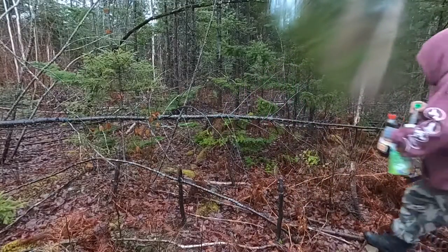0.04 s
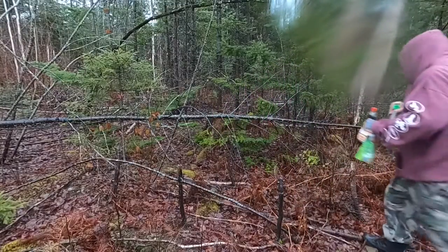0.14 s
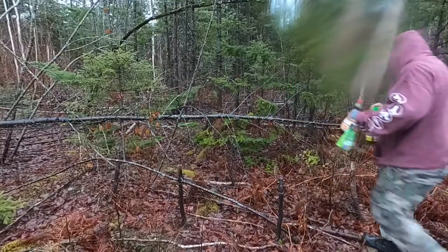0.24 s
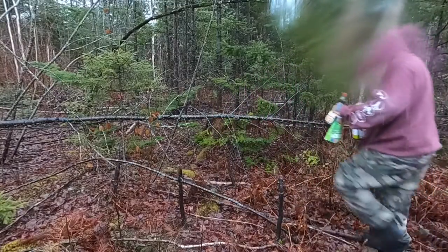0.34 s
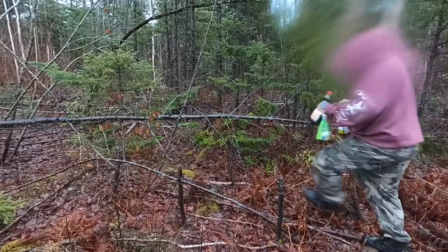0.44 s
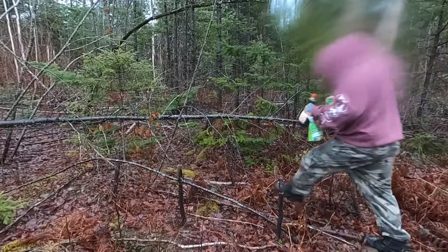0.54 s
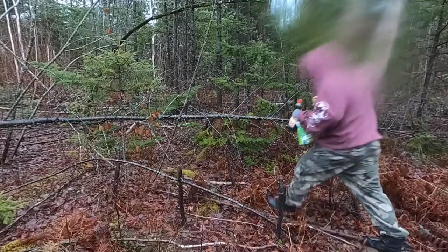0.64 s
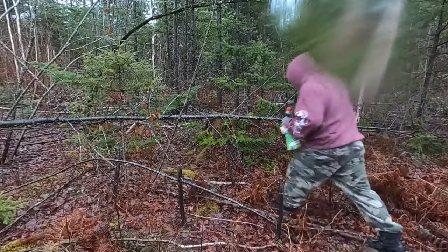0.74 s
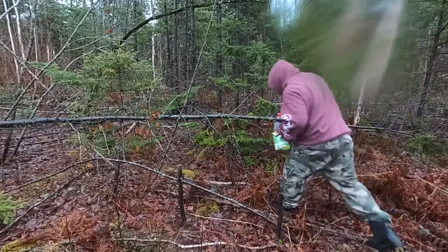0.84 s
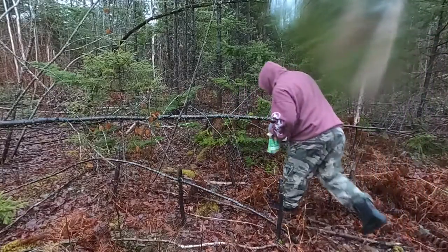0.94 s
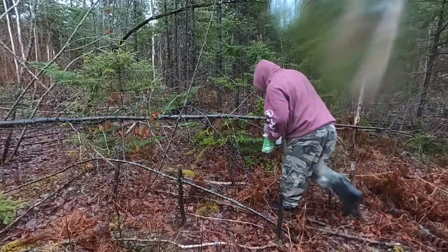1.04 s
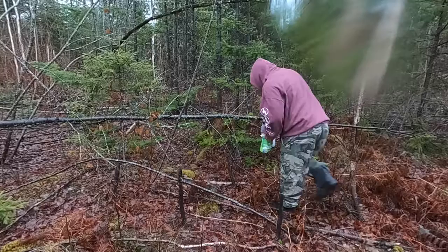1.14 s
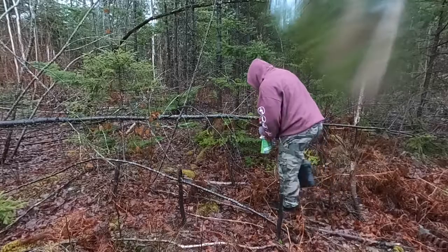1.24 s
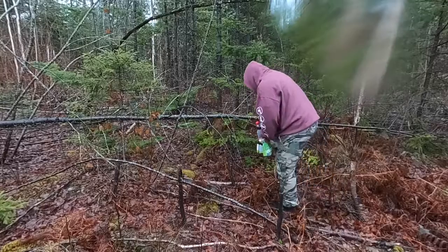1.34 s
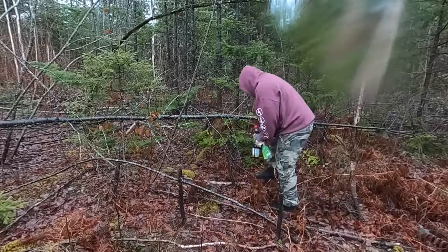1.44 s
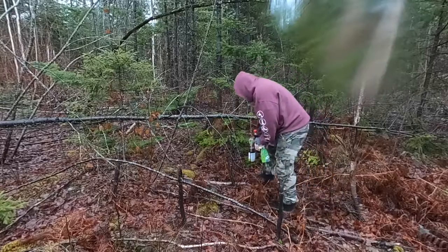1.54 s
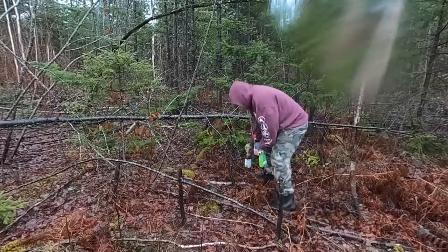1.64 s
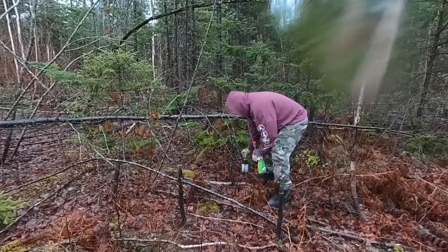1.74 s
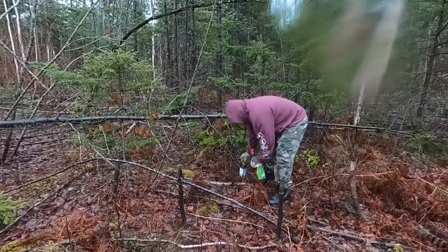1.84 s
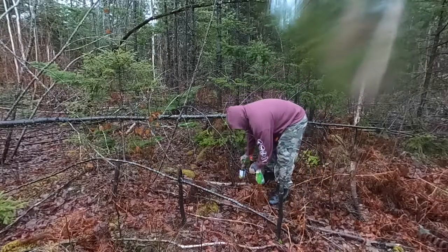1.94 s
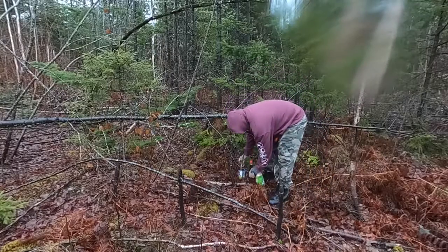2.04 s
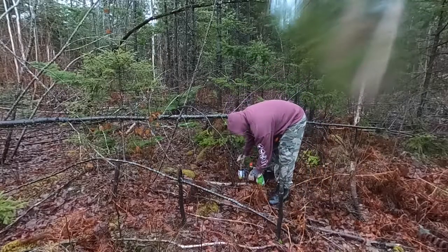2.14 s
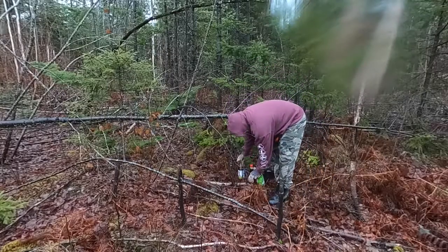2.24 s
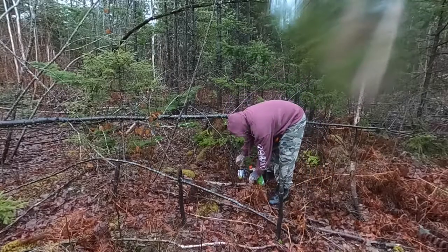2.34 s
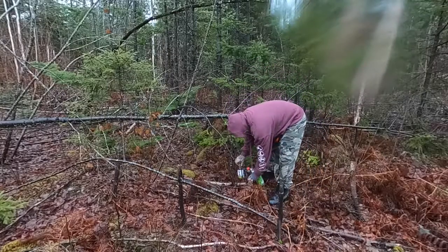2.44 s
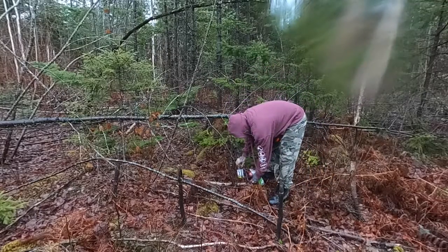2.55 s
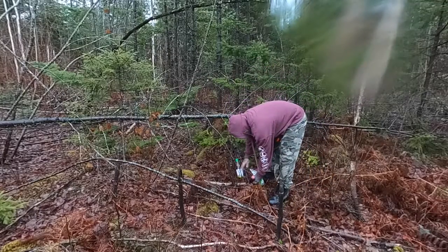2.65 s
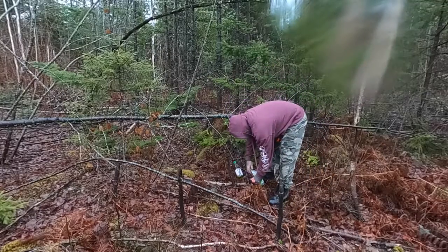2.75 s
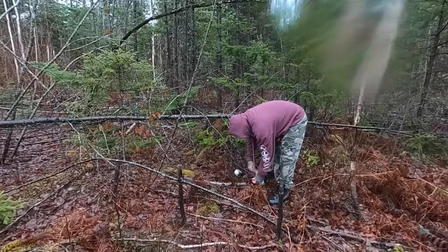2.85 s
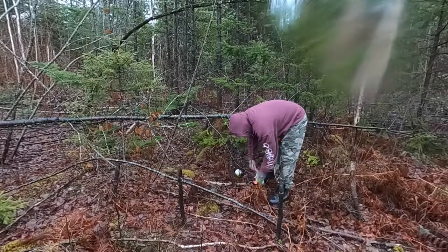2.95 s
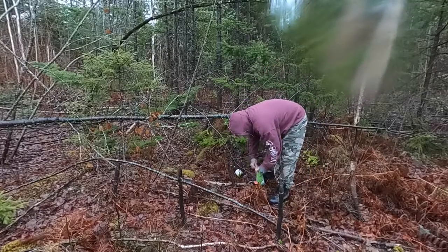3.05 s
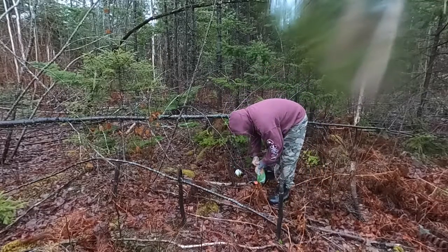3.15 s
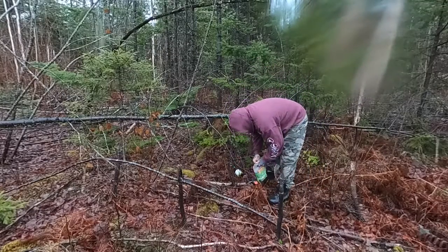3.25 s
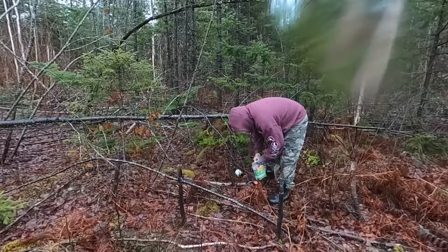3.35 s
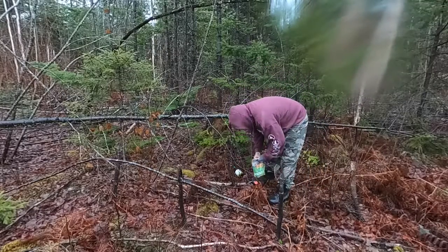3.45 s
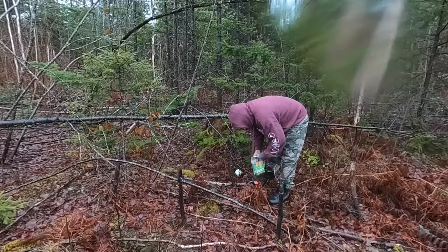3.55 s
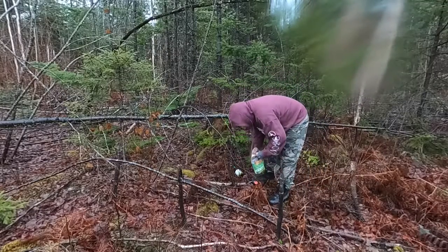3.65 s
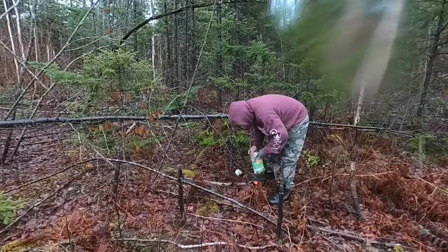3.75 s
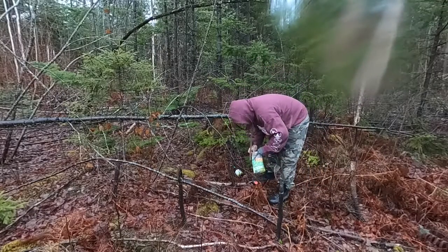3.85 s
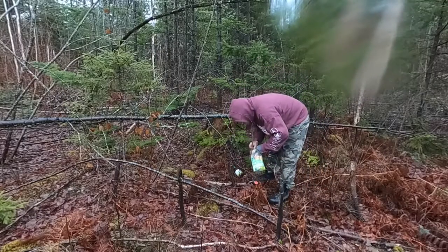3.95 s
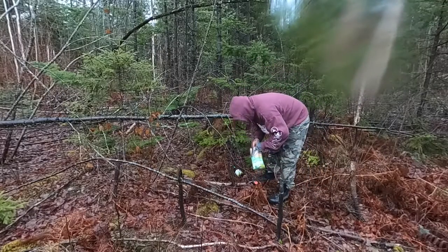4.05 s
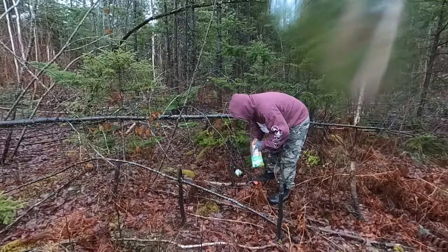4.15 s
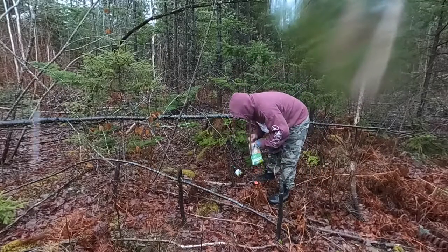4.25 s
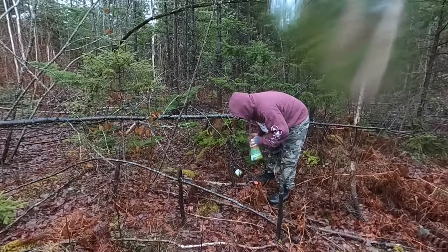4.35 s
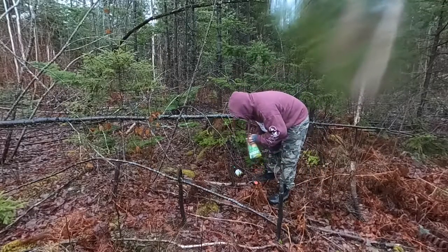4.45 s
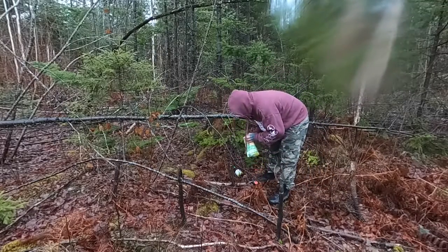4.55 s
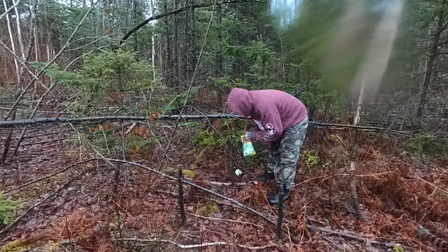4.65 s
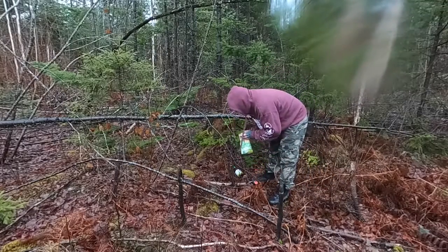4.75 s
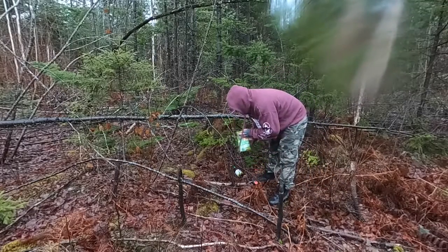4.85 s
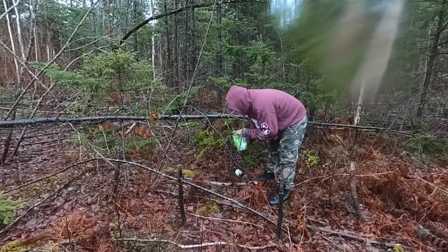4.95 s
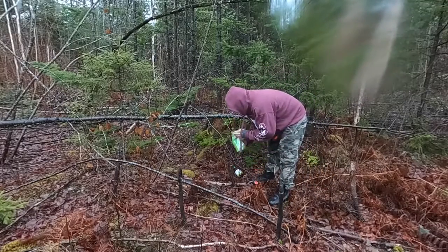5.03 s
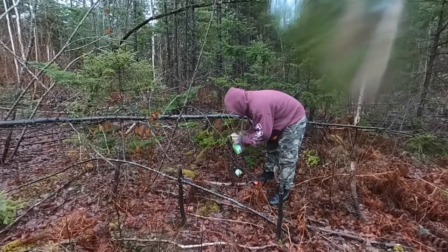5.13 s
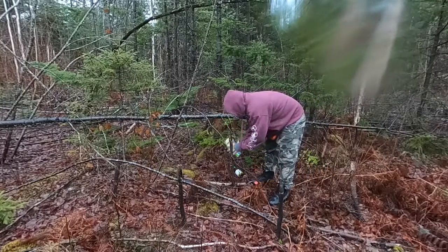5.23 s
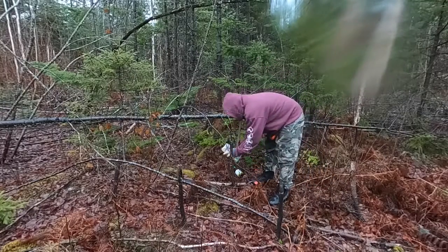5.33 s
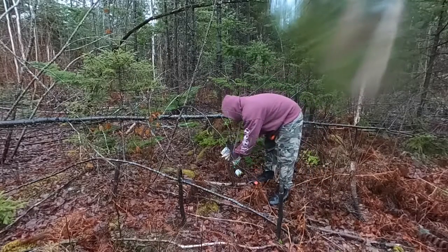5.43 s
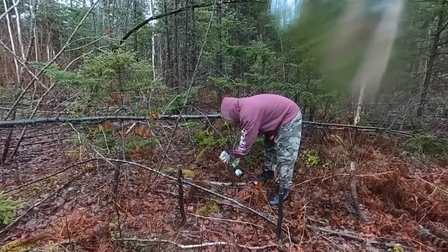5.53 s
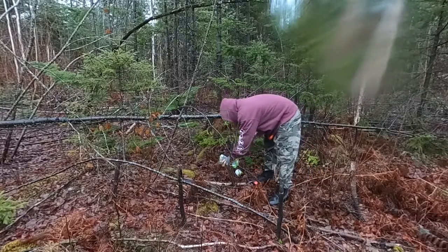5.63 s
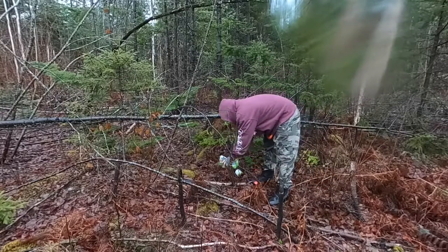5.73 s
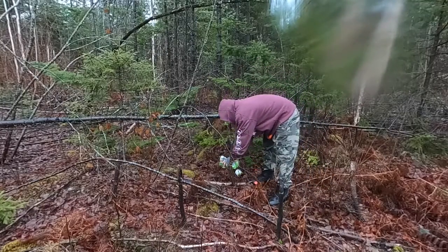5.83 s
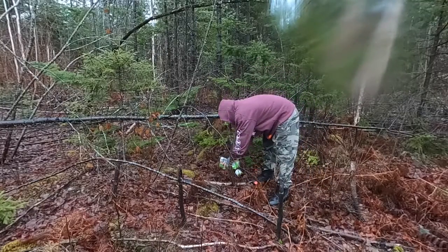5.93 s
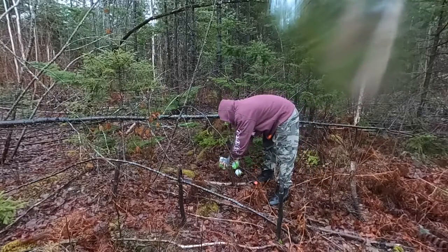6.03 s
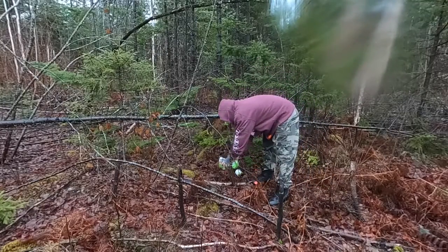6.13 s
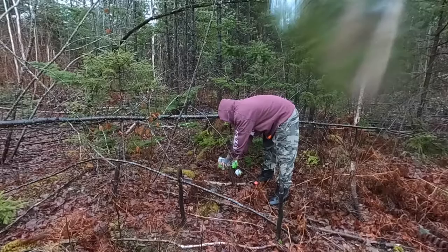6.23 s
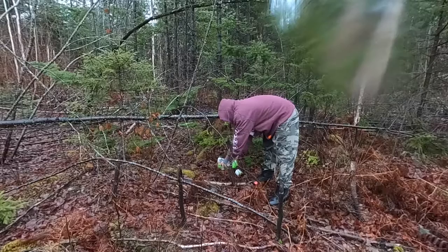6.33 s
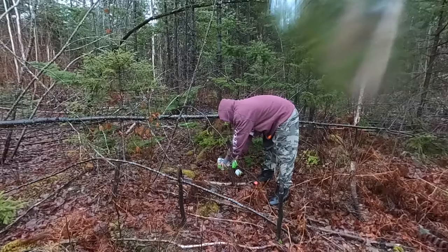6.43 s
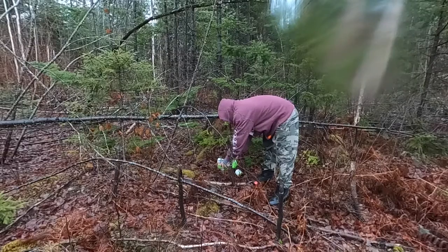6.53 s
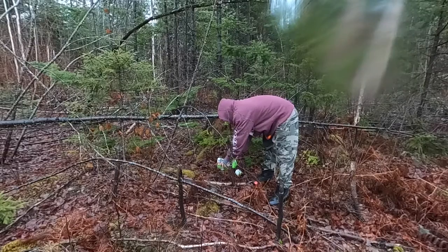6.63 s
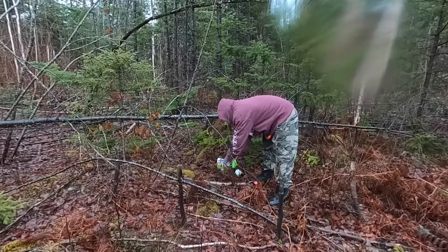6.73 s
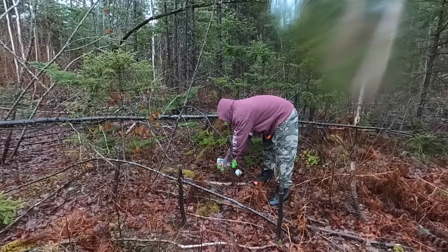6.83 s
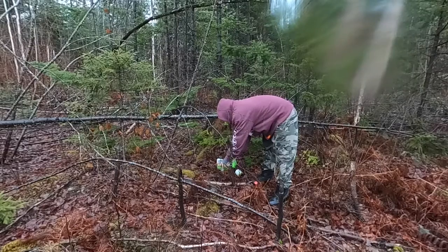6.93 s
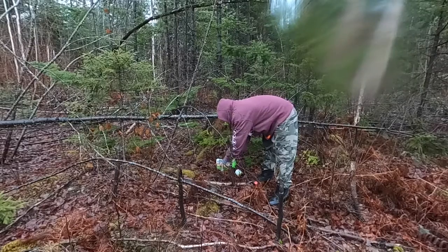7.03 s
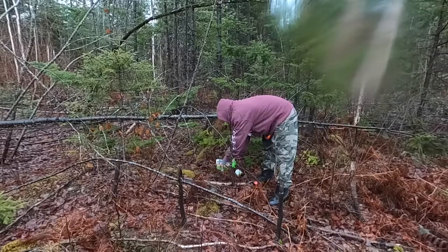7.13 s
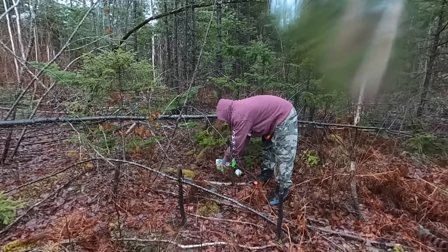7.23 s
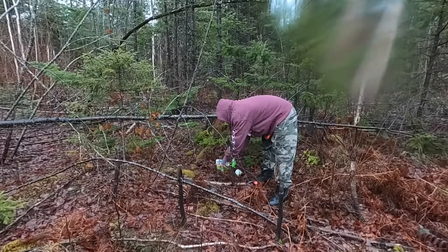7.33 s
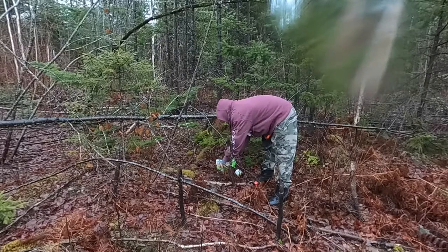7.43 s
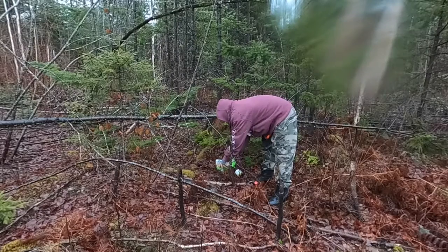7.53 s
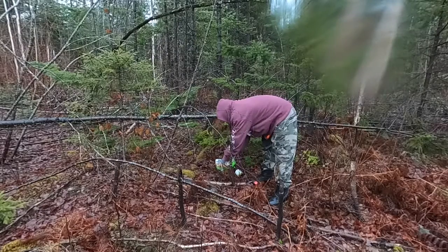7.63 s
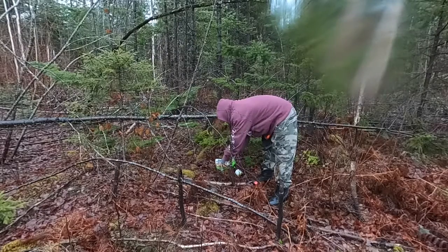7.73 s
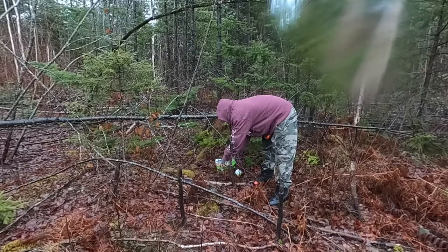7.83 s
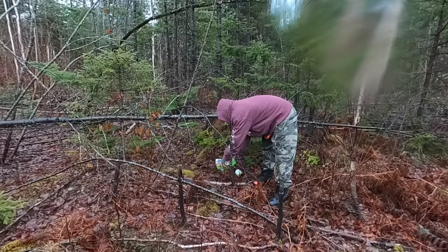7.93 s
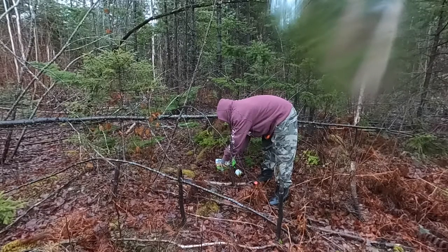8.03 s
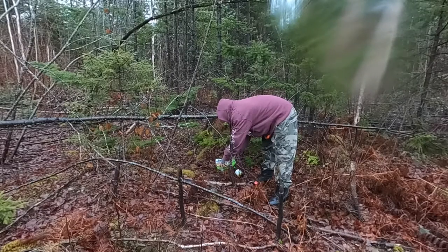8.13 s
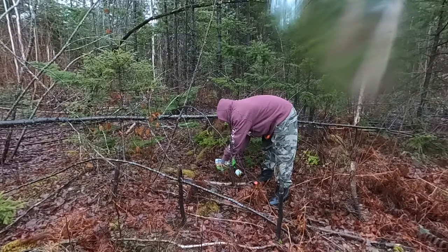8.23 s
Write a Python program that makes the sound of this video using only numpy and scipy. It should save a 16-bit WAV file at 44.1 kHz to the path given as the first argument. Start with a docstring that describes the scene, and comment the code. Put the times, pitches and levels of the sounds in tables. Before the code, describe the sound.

Brittle stems snap and fronds rustle under a walker's steps, then scattered picking and twig cracks thin out to a faint forest hush.

```python
"""Dry stems snap and crushed fronds crackle as boots stride into dead bracken in a quiet wood, some metres away.
The walker then stoops, shifts about and picks at the litter. Each stem is a noise volley with a ring of its own;
crackle is clumped random fractures, swishes are swelling noise, heels thud as sinking, fast-dying tones.
Sparse reflections from the trunks give a short tail. Below lie a far, dull rush of air (filtered noise),
one draught (low rumble) and one faint bird note (a sliding sine)."""
import sys
import numpy as np
from scipy import signal
from scipy.fft import rfft, irfft
from scipy.io import wavfile
from scipy.ndimage import uniform_filter1d

SR = 44100
rng = np.random.default_rng(int(sys.argv[2]) if len(sys.argv) > 2 else 0)


def persist_wave(psi):
    """Save psi, clipped to +-1, as 16-bit WAV."""
    counts = np.round(np.clip(psi, -1, 1) * 32767).astype(np.int16)
    wavfile.write(sys.argv[1], SR, np.atleast_2d(counts).T)


N = 365244
TIME_S = np.arange(N) / SR

# spectrum of the far air: f/Hz, level/dB
AIR_SPECTRUM = [(25, -4.5), (100, -8.5), (170, -3.5), (400, -0.2), (650, -6), (950, -11.5), (1600, -12.5),
                (2800, -26), (5600, -20.5), (7000, -25.5), (10000, -10.5), (14000, -19)]
# stir of air at the microphone: t/s, width/s, level/dB
DRAUGHT_SWELL = (6.97, .12, -54.5)
# far bird, points along one note: t/s, f/Hz, level/dB
BIRD_NOTE = [(2.326, 4670, -57), (2.339, 5620, -61), (2.351, 5440, -38)]
# fronds sweeping along legs and sleeves: t/s at the fastest, half width/s, level/dB
SWISH_EVENTS = [(0.3, 0.069, -50), (0.7, 0.025, -50), (1.13, 0.03, -49.5), (1.32, 0.14, -53.5),
                (1.61, 0.05, -52), (1.79, 0.059, -49), (1.889, 0.039, -44), (2.11, 0.17, -54.5),
                (2.92, 0.047, -52.5), (8.029, 0.084, -62.5)]
# spectrum of that brushing: f/Hz, level/dB
BRUSH_SPECTRUM = [(100, -24), (400, 5), (900, -9), (1600, 1.5), (2800, -5.5), (4000, -3), (5600, 0),
                  (7000, -3), (15000, -8)]
# spectrum of yielding ground: f/Hz, level/dB
SOIL_SPECTRUM = [(25, -32), (70, 1), (115, -14), (160, 7), (260, -11), (500, -11), (1200, -39)]
# weight landing on the soil: t/s, level/dB, initial f/Hz, decay/ms
HEEL_THUDS = [(0.065, -39.5, 256, 15), (0.147, -34.5, 309, 16), (0.227, -39, 334, 35),
              (0.308, -48, 142, 37), (0.7438, -17.5, 374, 2), (0.7547, -28.5, 181, 16),
              (0.769, -35, 96, 19), (0.817, -12.5, 290, 1.5), (1.035, -31, 384, 29),
              (1.286, -48.5, 154, 36), (1.616, -41, 214, 15), (3.715, -39.5, 176, 29)]
# boot or hand bearing down on the litter: start t/s, length/s, crackle level/dB, fizz over crackle/dB
LITTER_PRESSES = [ (0.03, 0.052, -44, -1.5), (0.103, 0.19, -49, -1.5), (0.208, 0.04, -43, -6),
                  (0.416, 0.1, -60.5, -11), (0.556, 0.024, -54, 8), (0.725, 0.044, -45, 8),
                  (0.782, 0.045, -50.5, 6), (0.845, 0.037, -38, -9), (0.894, 0.13, -41, -1),
                  (1.025, 0.045, -41, 0.5), (2.112, 0.049, -44.5, -1), (3.038, 0.051, -47, -5),
                  (3.103, 0.098, -58, -0.5), (3.222, 0.11, -51, 3), (3.364, 0.17, -57.5, 5),
                  (3.682, 0.034, -44.5, 1), (3.719, 0.032, -43, 5.5), (3.792, 0.054, -39.5, 3.5),
                  (3.869, 0.11, -53.5, -11), (4.117, 0.023, -48, 4), (4.195, 0.021, -52.5, 4.5),
                  (4.371, 0.079, -43.5, 1.5), (4.427, 0.047, -40.5, 2), (4.518, 0.025, -40.5, -3.5),
                  (4.564, 0.02, -38.5, -1), (4.907, 0.098, -48, 3), (5.017, 0.054, -43, 4.5),
                  (5.074, 0.17, -56.5, 2.5), (5.338, 0.042, -48, -2), (5.406, 0.087, -49, -6.5),
                  (5.499, 0.048, -47, 1), (5.586, 0.16, -56, 0.5), (5.771, 0.023, -55.5, 0.5),
                  (6.413, 0.042, -63.5, 6), (7.831, 0.062, -58.5, -13)]
# spectrum of the crackle's body: f/Hz, level/dB
LITTER_SPECTRUM = [(50, -18), (170, -4.5), (400, 4), (800, -2.5), (1450, 4.5), (2000, -5), (2700, -10),
                   (4500, -17)]
# spectrum of the fronds' fizz: f/Hz, level/dB
FROND_SPECTRUM = [(900, -14.5), (2000, -3), (2800, -5), (3900, -2), (5600, -10), (7000, -9)]
# stems snapping at listed moments, from loud cracks to faint ticks:
# t/s, woody body level/dB, splintering treble over body/dB, splintering decay/ms
STEM_SNAPS = [ (0.0255, -42.5, 10.5, 1.6), (0.097, -51, 8, 0.7), (0.128, -42.5, -12, 3.6),
              (0.249, -42, -12, 3.2), (0.2753, -34, 4, 3.8), (0.533, -46.5, -7, 2),
              (0.5512, -41.5, 3.5, 2.7), (0.5603, -39.5, 8, 1.2), (0.6295, -52.5, 4.5, 1.9),
              (0.722, -37, 6.5, 1.5), (0.7312, -36, 0, 1.6), (0.7442, -26.5, 0.5, 1.3), (0.762, -42, 4, 2),
              (0.7997, -56, 19, 0.31), (0.8175, -32.5, -9, 1.2), (0.8437, -45, 9, 1.3),
              (0.8538, -41, 9, 2.8), (0.8609, -34, 6, 3.3), (0.868, -38.5, 6, 2), (0.8955, -36, -1, 1.7),
              (0.9006, -40, 16, 1.1), (0.93, -35.5, -2, 2.2), (0.9561, -32.5, 7, 1.5), (0.998, -40.5, 6, 3),
              (1.025, -35, 5.5, 5.6), (1.033, -39.5, 8, 3.4), (1.0512, -32, 1.5, 8.3), (1.067, -37, 6, 2.3),
              (1.129, -40, 4, 2.6), (1.281, -51, -9, 1), (1.305, -58, 10.5, 1), (1.3604, -41.5, -3, 3),
              (2.008, -52.5, 9.5, 1.6), (2.016, -57, 10, 1.3), (2.0907, -35.5, 4, 1.7),
              (2.1789, -44, 9, 2.8), (2.2289, -49, 16.5, 1.5), (2.3126, -54.5, 10.5, 2.4),
              (2.872, -54, 11.5, 1), (3.0527, -46, 12.5, 1.2), (3.0688, -46.5, 14.5, 2.2),
              (3.094, -53, 9, 1.5), (3.1292, -46, 7.5, 5.9), (3.1952, -47.5, 5, 1.8),
              (3.233, -46.5, 10, 1.1), (3.296, -44.5, 9, .8), (3.319, -57, 23.5, 2.3),
              (3.3674, -42.5, 1, 1.9), (3.4095, -52.5, 20.5, 1.7), (3.477, -46.5, 7, 1.6),
              (3.505, -42.5, 2, 1.4), (3.5213, -48, 11.5, 2.9), (3.6098, -47, 1.5, 1.1),
              (3.7044, -40.5, 9.5, 5.7), (3.7206, -32.5, 7.5, 2.5), (3.7657, -39, 7, 2.2),
              (3.7818, -35, 7, 4.4), (3.8039, -35.5, 2, 4.4), (3.8096, -29.5, 5, 3.5),
              (3.8224, -41, 9, 2.4), (3.833, -42, -0.5, 2), (3.8455, -39, 6.5, 2.2), (3.8824, -44, 4, 1.6),
              (3.9262, -42, 3, 2.8), (4.127, -50.5, 5, 5), (4.156, -46, 11, 7), (4.301, -46.5, 4.5, 10.4),
              (4.3877, -47, 7, 2.3), (4.4229, -40.5, 0.5, 1.9), (4.5302, -33, -4.5, 2.2),
              (4.537, -41.5, 4.5, 2), (4.581, -27.5, -5.5, 3.3), (4.6014, -28.5, -0.5, 1.4),
              (4.8506, -37.5, 2.5, 2.5), (4.9597, -44.5, 18, 1.7), (4.98, -41.5, 5.5, 1.5),
              (5.032, -38, 7.5, 4.6), (5.049, -35, 0, 1.5), (5.0538, -32, 6, 1.5), (5.101, -41, 2, 9.2),
              (5.133, -41.5, 4, 8.1), (5.165, -42, -2.5, 1.8), (5.1871, -44, 3, 2.6),
              (5.363, -40, 5.5, 2.5), (5.373, -47.5, 7.5, 5.2), (5.4258, -42.5, 7, 3.2),
              (5.4573, -43, 1.5, 2), (5.5084, -40.5, 1.5, 5.2), (5.6232, -42.5, 0, 7.3),
              (5.646, -49, 7, 1.2), (5.655, -40.5, 0.5, 0.8), (5.6642, -37.5, -6, 0.82),
              (5.6928, -42.5, 9.5, 1.4), (5.704, -38.5, 2.5, 0.76), (5.794, -50, 3.5, 1.7),
              (5.916, -50.5, -1.5, 1.6), (5.9483, -54.5, 1.5, 1.2), (6.175, -71, 19, 0.99),
              (6.4094, -38, -2, 2.4), (6.432, -62.5, 15, 1.2), (6.9542, -51, 9.5, 1),
              (7.6494, -64.5, 15.5, 3.5), (7.8908, -47.5, -22, 1.1), (7.9766, -50, -13, 0.8),
              (8.0747, -55.5, 8.5, 6)]
# spectrum of a stem's woody body: f/Hz, level/dB
WOOD_SPECTRUM = [(50, -30), (180, -15), (400, -2.5), (780, -1.5), (1050, -0.5), (1500, 1), (2700, -7.5),
                 (4500, -34.5)]
# spectrum of its splintering treble: f/Hz, level/dB
SPLINTER_SPECTRUM = [(900, -40), (2000, -2), (2800, -3), (3900, 1), (5600, 2), (7000, 0)]
# difference between the two ports: f/Hz, level/dB
SIDE_SPECTRUM = [(40, -13), (120, -8.5), (550, -22), (1500, -3.5), (6000, -2.5), (8000, -2.5), (12000, 6)]
# microphone response, thin bass and steep top roll-off: f/Hz, level/dB
MICROPHONE_RESPONSE = [(120, -5.5), (160, 1.5), (7100, 0.5), (8000, -11.5), (9000, -27), (12000, -31.5),
                       (15000, -46)]

AIR_DB = -55.5
PRESS_ATTACK_S, PRESS_RELEASE_S = 0.0069, 0.021
EASE_DB = -2  # load at the ends of a press, relative to its middle
SETTLE_DB, SETTLE_S = -14.5, 0.063  # creak of fronds after a press
PICKING_DB, PICKING_FROM_S = -74.5, 5.6  # light, dull crackle under the hands
CLUMP_DB = 3.5  # rms depth of the crackle's clumping
RUB = 0.55  # leaf rub, relative to the fractures
STRAIN_S = 0.006  # strain before the crack
THINNESS_DB = 26  # extra treble per octave of higher splinter ring
TWIG_DB = -13  # offset of the unlisted twigs
BAND_EDGE_HZ = 15300


def from_db(db):
    """Decibels to gain."""
    return 10 ** (np.asarray(db) / 20)


def unit(x):
    """Scales to rms 1."""
    return x / np.sqrt(np.mean(x ** 2) + 1e-20)


def add(mix, t_s, sound):
    """Mixes a sound in at t_s, trimmed at the end."""
    part = mix[..., max(round(t_s * SR), 0):][..., :sound.shape[-1]]
    part += sound[..., :part.shape[-1]]


def minimum_phase(points, size=2048):
    """Causal impulse response of a spectrum: sharp front, short ring."""
    hz, db = np.transpose(points)
    bins_hz = abs(np.fft.fftfreq(size, 1 / SR)) + 1
    log_gain = np.log(from_db(np.interp(np.log(bins_hz), np.log(hz), db)))
    # the Hilbert transform of the log gain yields the minimum phase
    spectrum = np.exp(np.conj(signal.hilbert(log_gain)))
    return np.fft.ifft(spectrum).real[:size // 2]


def colour(x, points):
    """Filters a sound through a spectrum."""
    return signal.oaconvolve(x, minimum_phase(points))[:len(x)]


def drift(hz):
    """Slow noise of rms 1, Gaussian roll-off at about hz."""
    lowpass = np.exp(-(np.fft.rfftfreq(N, 1 / SR) / hz) ** 2)
    return unit(irfft(rfft(rng.standard_normal(N)) * lowpass, N))


def ring(x, hz, q):
    """Short, damped resonance of one stem."""
    b, a = signal.iirpeak(min(hz, 9000), q, fs=SR)
    return signal.lfilter(b, a, x)


def air(swell_db=1.9):
    """Far rush of air in the trees, with a faint hiss of needles: filtered noise, slowly swelling."""
    rush = unit(colour(rng.standard_normal(N), AIR_SPECTRUM))
    return from_db(AIR_DB) * rush * from_db(swell_db * drift(4.9))


def draught():
    """Stir of air rumbling on the microphone: noise below 45 Hz, swelling and dying away."""
    t_s, width_s, db = DRAUGHT_SWELL
    lowpass = signal.butter(3, 45, fs=SR, output="sos")
    rumble = unit(signal.sosfilt(lowpass, rng.standard_normal(N)))
    return rumble * from_db(db) * np.exp(-((TIME_S - t_s) / width_s) ** 2 / 2)


def bird():
    """Near-pure whistle: a sine that slides up, then eases down a little."""
    t_s, hz, db = np.transpose(BIRD_NOTE)
    t = np.arange(t_s[0], t_s[-1], 1 / SR)
    whistle = np.sin(2 * np.pi * np.cumsum(np.interp(t, t_s, hz)) / SR)
    out = np.zeros(N)
    add(out, t_s[0], whistle * from_db(np.interp(t, t_s, db)) * signal.windows.tukey(len(t), 0.3))
    return out


def trunks(x, t60_s, rise_s=0.00069, size=16000, count=3, echoes_per_s=3000):
    """Sparse, decaying reflections from ground, trunks and branches; the paths keep trading shares."""
    t, out = np.arange(size) / SR, np.zeros(N)
    for k in range(count):
        taps = rng.standard_normal(size) * (rng.random(size) < echoes_per_s / SR)
        taps *= from_db(-60 * t / t60_s) * (1 - np.exp(-t / rise_s))
        share = np.cos(np.pi * (2 * TIME_S + k / count)) * np.sqrt(2 / count)
        out += signal.oaconvolve(x * share, taps / np.linalg.norm(taps))[:N]
    return out


def pressure():
    """Crackle and fizz levels/dB: each press builds up, swells, lets go and leaves the fronds settling."""
    picking = np.outer([from_db(PICKING_DB) ** 2, 0], TIME_S > PICKING_FROM_S)  # no fizz
    power = 1e-8 + picking
    for start_s, length_s, db, fizz_db in LITTER_PRESSES:
        since_s = TIME_S - start_s
        rise = np.clip(since_s / PRESS_ATTACK_S, 0, 1)
        swell = from_db(EASE_DB * (2 * np.clip(since_s / length_s, 0, 1) - 1) ** 2)
        after_s = np.maximum(since_s - length_s, 0)
        settling = from_db(SETTLE_DB) * np.exp(-after_s / SETTLE_S)
        fall = np.maximum(np.exp(-after_s / PRESS_RELEASE_S), settling)
        power += np.outer(from_db([db, db + fizz_db]), rise * swell * fall) ** 2
    return 10 * np.log10(power)


def soil(body_db, level_db=-52, full_weight_db=-40, steepness=1.37):
    """Dull rumble of yielding humus: filtered noise that grows faster than the press."""
    rumble = unit(colour(rng.standard_normal(N), SOIL_SPECTRUM))
    return rumble * from_db(level_db + steepness * (body_db - full_weight_db))


def thuds(sag=0.213, grit=0.69, rise_s=0.00013, size=8000):
    """Soil answers a heel with a few low, uneven cycles that sink in pitch."""
    out, t = np.zeros(N), np.arange(size) / SR
    for t_s, db, hz, ms in HEEL_THUDS:
        decay = np.exp(-t * 1e3 / ms)
        push = np.sin(2 * np.pi * np.cumsum(hz * (1 - sag * (1 - decay))) / SR)
        band = signal.butter(2, [hz / 2, hz * 2], "bandpass", fs=SR, output="sos")
        crumble = unit(signal.sosfilt(band, rng.standard_normal(size)))
        thud = (0.74 * push + grit * crumble) * decay * (1 - np.exp(-t / rise_s))
        add(out, t_s, from_db(db) * thud)
    return out


def swishes(catches_per_s=450, catch_gain=0.63, flutter_db=2.0):
    """Leaflets slide over cloth and catch on it: noise and impulses that swell with the limb's speed."""
    power = sum(from_db(db) ** 2 * np.exp(-((TIME_S - t_s) / width_s) ** 2)
                for t_s, width_s, db in SWISH_EVENTS)
    catches = unit(rng.standard_normal(N) * (rng.random(N) < catches_per_s / SR))
    sliding = (rng.standard_normal(N) + catch_gain * catches) * from_db(flutter_db * drift(65))
    return unit(colour(sliding, BRUSH_SPECTRUM)) * np.sqrt(power)


def crackle(body_db, treble_db, per_s=1800, thinning_db=32, spread_db=1.0, ring_gain=1.2, q=6,
            wander_hz=22, clump_hz=65, crackle_db=-1, fizz_db=-1, count=14):
    """Tiny fractures come in clumps, each ringing one of many stalks, over the rub of leaf on leaf."""
    # a light touch gives few, separate ticks
    rate = per_s * 10 ** ((body_db - body_db.max()) / thinning_db)
    sizes = from_db(spread_db * np.minimum(rng.exponential(1, N), np.pi))
    sizes *= (rng.random(N) < rate / SR) / np.sqrt(rate)
    surge = drift(clump_hz)
    # the boot keeps meeting other stalks
    stalk = (count / 2 * (drift(wander_hz) + rng.random(N))).astype(int) % count
    out = np.zeros(N)
    layers = ((LITTER_SPECTRUM, body_db + crackle_db, 1100), (FROND_SPECTRUM, treble_db + fizz_db, 4300))
    for points, level_db, centre_hz in layers:
        clumps = from_db(CLUMP_DB * unit(surge + drift(clump_hz)))  # some woody, others papery
        breaks = unit(sizes * rng.standard_normal(N))  # body and fizz drawn separately
        notes_hz = np.geomspace(centre_hz / 2, centre_hz * 2, count)
        notes = sum(ring(breaks * (stalk == k), hz, q) for k, hz in enumerate(notes_hz))
        rub = RUB * rng.standard_normal(N)
        grains = colour(clumps * (breaks + ring_gain * notes + rub), points)
        # level over 50 ms, so that the press alone sets the power
        grains /= np.sqrt(abs(uniform_filter1d(grains ** 2, size=2200)) + 1e-12)
        out += grains * from_db(level_db)
    return out


def stem(db, bright_db, ms, first=2.4, strain=0.097, strain_ms=4.0, fibre_spread=0.24, ring_gain=1.48,
         note_spread=0.43, q=6, size=1200, count=290):
    """Fibres strain, the stem gives way in one crack, the rest tear in a fast-dying volley."""
    at = round(STRAIN_S * SR)
    t_ms = (np.arange(size) - at) * 1e3 / SR
    tear, strength = rng.standard_normal((2, size))
    straining = strain * np.exp(-abs(t_ms) / strain_ms)
    shape = np.where(t_ms < 0, straining, np.exp(-abs(t_ms) / ms))
    volley = unit(tear * np.exp(fibre_spread * strength)) * shape
    volley[at] = 2 * first * np.sign(tear[at])
    splinter_hz = 3800 * 2 ** (bright_db / THINNESS_DB)  # thin stems: brighter, higher
    out = np.zeros(size)
    layers = ((WOOD_SPECTRUM, db, 1480), (SPLINTER_SPECTRUM, db + bright_db, splinter_hz))
    for points, level_db, hz in layers:
        own_note = ring(volley, hz * 2 ** (note_spread * rng.uniform(-0.77, 1)), q)
        crack = colour(volley + ring_gain * own_note, points)
        # level is the rms over count samples from the crack
        out += from_db(level_db) * crack / np.sqrt(np.mean(crack[at:at + count] ** 2))
    return out


def twiglets(body_db, treble_db, firm_db=-43, light_touch=0.61, spread_db=5.0, cap=2.54, bright_db=4,
             follow=0.37, bright_spread_db=7, ms=2.3, count=700):
    """Thin twigs break at random, most of them faint; a light touch quietens them, less fizz dulls them."""
    out = np.zeros(N)
    for k, (place, chance, brightness) in enumerate(rng.random((count, 3))):
        at = int((k + place) / count * N)
        touch_db = firm_db + light_touch * min(body_db[at] - firm_db, 0)
        db = touch_db + TWIG_DB + spread_db * min(-np.log(1 - chance), cap)
        splinter_db = bright_db + follow * (treble_db[at] - body_db[at])
        splinter_db += bright_spread_db * (2 * brightness - 1)
        add(out, at / SR, stem(db, splinter_db, ms))
    return out


def snaps():
    """Thick and thin stems, each cracking at its listed moment."""
    out = np.zeros(N)
    for t_s, db, bright_db, ms in STEM_SNAPS:
        add(out, t_s - STRAIN_S, stem(db, bright_db, ms))
    return out


def scene(near_db=-10, far_db=-21, wide_db=-14.5, air_wide_db=-3, draught_wide_db=-5):
    """Two ports hear almost the same; mostly the treble spreads, and the walker leans right."""
    body_db, treble_db = pressure()
    direct = soil(body_db) + thuds() + swishes() + bird()
    direct += crackle(body_db, treble_db) + twiglets(body_db, treble_db) + snaps()
    near = from_db(near_db) * trunks(direct, t60_s=0.055)
    far = from_db(far_db) * trunks(direct, t60_s=0.72)
    middle = direct + near + far + air() + draught()
    scatter = from_db(wide_db) * trunks(direct, t60_s=0.0054)
    lean = 0.16 * direct
    side = colour(scatter + from_db(air_wide_db) * air() - lean, SIDE_SPECTRUM)
    side += from_db(draught_wide_db) * draught()
    return np.array([middle + side, middle - side])


def record(dry):
    """Microphone response, then a linear-phase band limit."""
    heard = np.array([colour(channel, MICROPHONE_RESPONSE) for channel in dry])
    lowpass = signal.firwin(511, BAND_EDGE_HZ, window=("kaiser", 9), fs=SR)
    return signal.oaconvolve(heard, lowpass[None], "same")


dry = scene()
out = record(dry)
persist_wave(out)
```